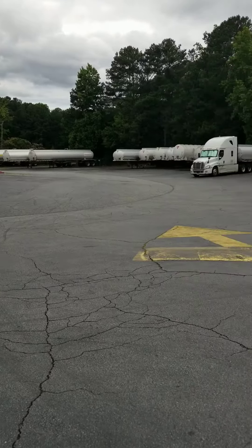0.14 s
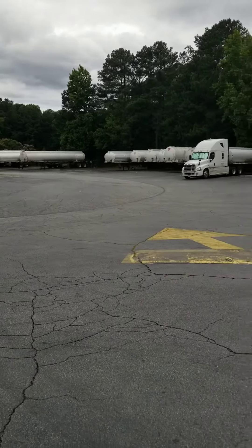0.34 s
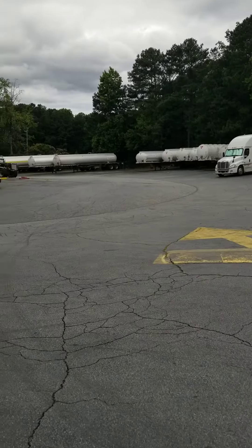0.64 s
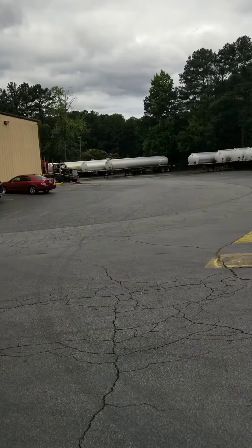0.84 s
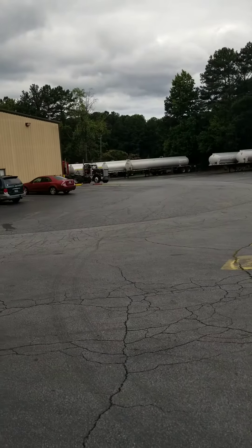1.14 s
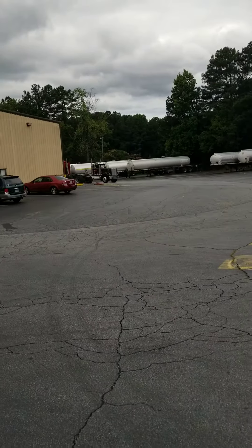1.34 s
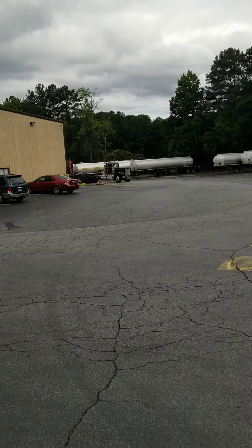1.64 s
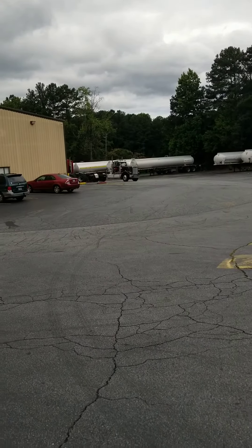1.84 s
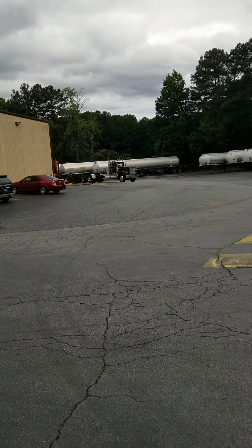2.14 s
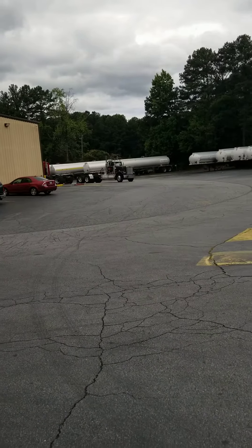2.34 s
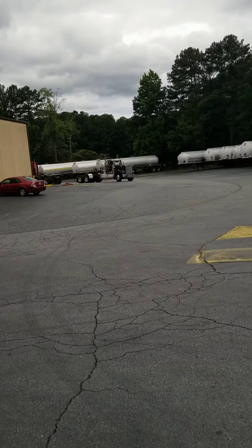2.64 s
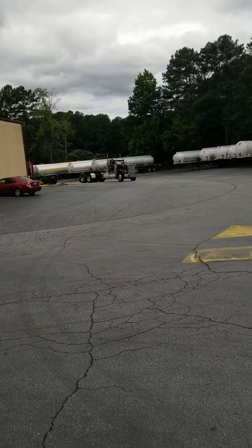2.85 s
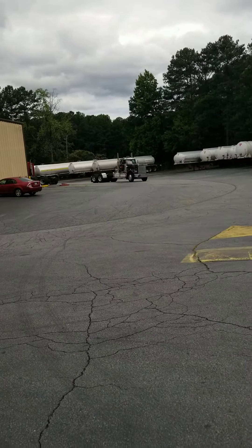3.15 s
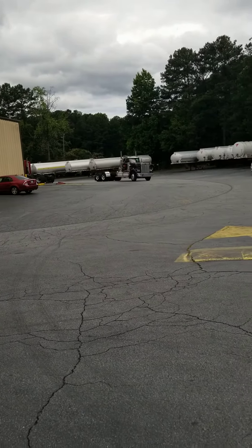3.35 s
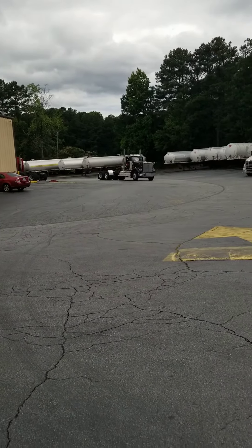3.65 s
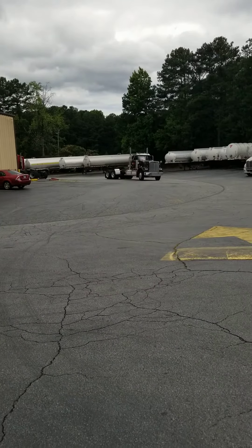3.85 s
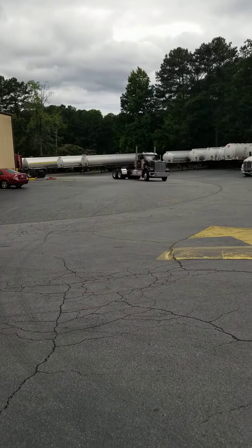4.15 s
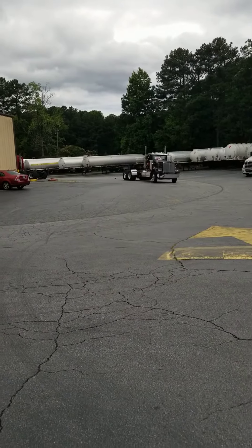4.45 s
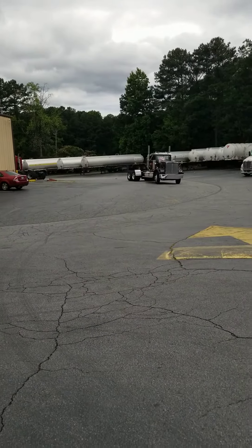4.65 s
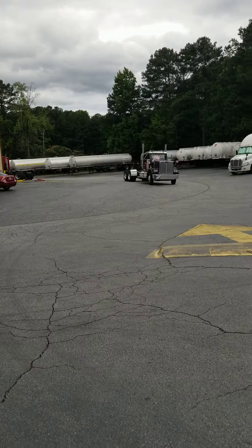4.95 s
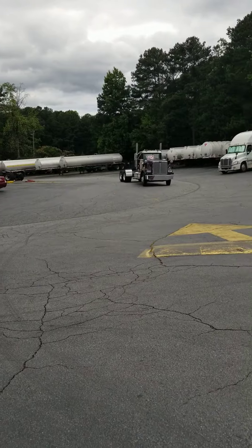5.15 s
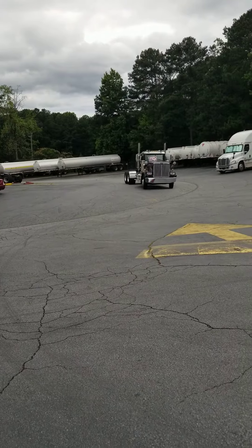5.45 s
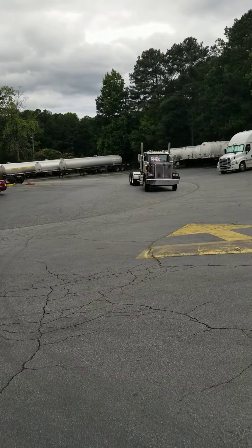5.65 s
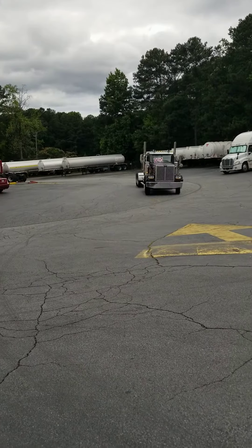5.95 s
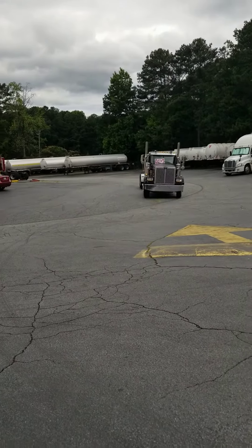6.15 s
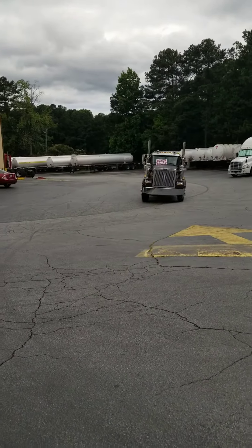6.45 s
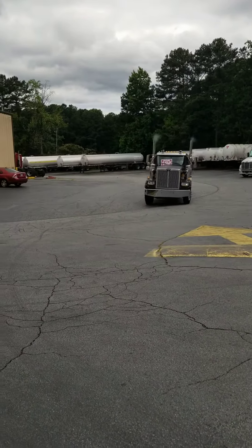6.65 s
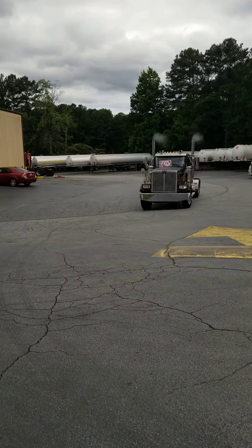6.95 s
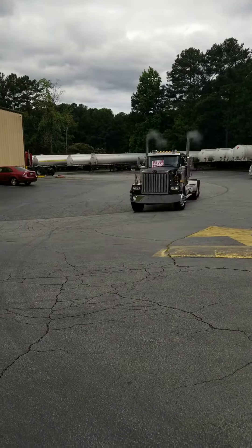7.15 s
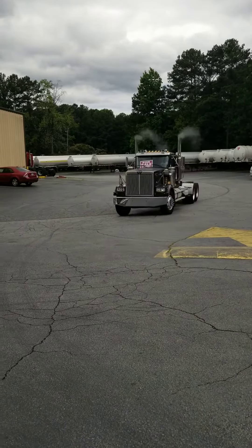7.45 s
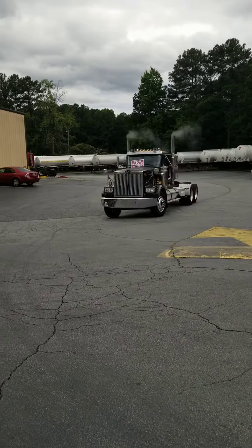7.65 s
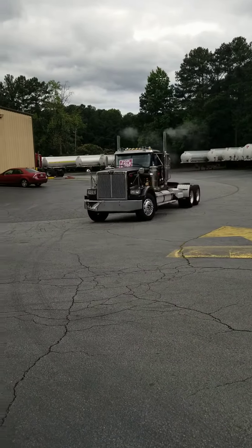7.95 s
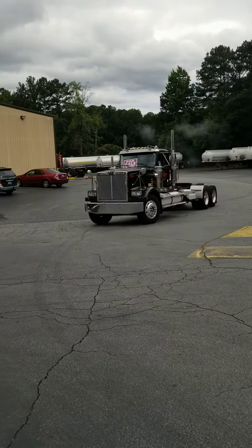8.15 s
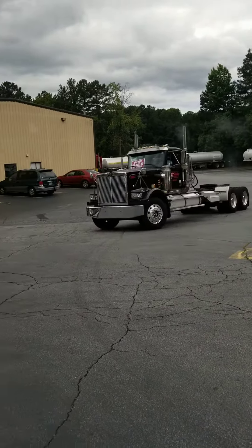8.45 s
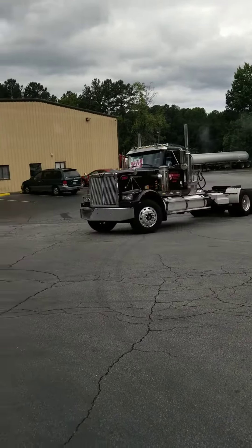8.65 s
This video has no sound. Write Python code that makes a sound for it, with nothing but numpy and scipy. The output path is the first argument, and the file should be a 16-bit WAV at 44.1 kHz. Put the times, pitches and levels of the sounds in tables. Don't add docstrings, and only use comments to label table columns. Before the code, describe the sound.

From 0 to 1 s a distant diesel truck is faint and dull behind a shed, over a soft low breeze. From 1 to 2.5 s it emerges, its twin stacks droning with a lumpy, uneven beat. Between 2.5 and 5.8 s the firing note climbs steadily from about 80 to 94 Hz, swelling, with mechanical clatter, narrow airy intake rush, tyre rumble, hiss and a thin gear whine. Near 5.9 s the exhaust drops away under a low gust. From 6.0 to 7.3 s the engine brake barks very loudly: rapid, irregular, crackling pops with hollow pipe thumps, slowing in pitch and echoing around the yard for about half a second. It stops abruptly; quieter coasting follows, low at about 62 Hz, with small metallic knocks around 8.0 s. From 8.4 s to the end near 8.8 s the engine pulls again, louder and nearer. Stereo phone pickup, treble weaker on the left.

```python
import sys
import numpy as np
from scipy import signal
from scipy.fft import rfft, irfft
from scipy.io import wavfile
from scipy.ndimage import uniform_filter1d

SR = 44100
rng = np.random.default_rng(int(sys.argv[2]) if len(sys.argv) > 2 else 0)


def volts_from_decibels(level):
    exponent = np.asarray(level, float) / 20
    return 10 ** exponent


def inscribe(sig):
    pcm = np.round(np.clip(np.atleast_2d(sig).T, -1, 1) * 32767)
    wavfile.write(sys.argv[1], SR, pcm.astype(np.int16))


N = 388521
T = np.arange(N) / SR
HZ = np.maximum(np.arange(N // 2 + 1) * SR / N, 1)

BRAKE_ON_S, BRAKE_FULL_S, BRAKE_OFF_S = 5.995, 6.095, 7.325
SHED_DB, EMERGE_S = -15, 1.66
START_M, APPROACH_M_S = 56.33, 3.686
HEIGHTS_M2 = 6.324


def curves(table):
    s, *columns = np.transpose(table)
    return [np.interp(T, s, c) for c in columns]


def along(table):
    hz, value = np.transpose(table)
    return np.interp(np.log(HZ), np.log(np.maximum(hz, 1)), value)


def unit(x):
    return x / np.sqrt(np.mean(x ** 2))


def colour(x, table):
    return irfft(rfft(x) * volts_from_decibels(along(table)), N)


def struck(x, table):
    fold = irfft(np.log(volts_from_decibels(along(table))), N)
    fold[1:N // 2] *= 2
    fold[N // 2 + 1:] = 0
    return irfft(rfft(x) * np.exp(rfft(fold)), N)


def between(spectrum, low_hz, top_hz):
    return irfft(spectrum * ((HZ >= low_hz) & (HZ < top_hz)), N)


def resonance(x, hz, width_hz):
    return signal.lfilter(*signal.iirpeak(hz, hz / width_hz, fs=SR), x)


def walk(rate_hz):
    hold = int(SR / rate_hz)
    steps = np.repeat(rng.standard_normal(N // 300), hold)[:N]
    return 1.57 * uniform_filter1d(uniform_filter1d(steps, hold), hold)


def clicks(times_s, gains):
    out = np.zeros(N)
    np.add.at(out, (np.asarray(times_s) * SR).astype(int), gains)
    return out


def puffs(x, rise_s, fall_s):
    t = T[:2048]
    return signal.fftconvolve(x, (1 - np.exp(-t / rise_s)) * np.exp(-t / fall_s))[:N]


# hz, alike (0-1)
PORT_LIKENESS = [(60, 0.87), (300, 1), (600, 0.57), (1200, 0.63), (2500, 0.93), (5000, 0), (9000, 0),
                 (15000, 0.7)]


def wide_noise():
    mid, side = rfft(rng.standard_normal((2, N)))
    alike = np.clip(along(PORT_LIKENESS), 0, 1)
    mid, side = mid * np.sqrt(1 + alike), side * np.sqrt(1 - alike)
    return irfft(np.array([mid + side, mid - side]), N) / np.sqrt(2)


def off_ground(x, gain):
    distance_m = START_M - APPROACH_M_S * T
    place = np.arange(N) - 2 * HEIGHTS_M2 / distance_m * SR / 343
    return x + gain * np.array([np.interp(place, np.arange(N), c) for c in x])


# hz, level_db (per Hz)
BREEZE_COLOUR = [(12, -22), (25, 7), (40, 11), (60, 13), (100, -8.5), (200, -29.5), (3000, -79.5)]
BREEZE_DB, BREEZE_DB_PER_S = -52.5, 0.26
GUST_S, GUST_WIDTH_S, GUST_DB = 5.9, 0.35, 17.5


def breeze():
    gust_db = GUST_DB * np.exp(-((T - GUST_S) / GUST_WIDTH_S) ** 2)
    level_db = BREEZE_DB + BREEZE_DB_PER_S * T + 2 * walk(2.5) + gust_db
    return unit(colour(wide_noise(), BREEZE_COLOUR)) * volts_from_decibels(level_db)


YARD_T60_S, YARD_DB = .5, -13


def yard(x):
    t = T[:SR]
    own = rng.standard_normal((3, SR))
    own = own[0] + signal.lfilter([.7, -.55], [1, -.8], own[1:])
    fading = np.exp(-np.log(1000) * t / YARD_T60_S) * (t > .008)
    tail = signal.lfilter([1], [1, -.55], own * fading)
    tail = tail / np.sqrt(np.sum(tail[0] ** 2))
    return volts_from_decibels(YARD_DB) * signal.fftconvolve(x, tail, axes=1)[:, :N]


# start_s, pitch_hz, level_db
LOOSE_METAL = [
    (7.98, 1880, -35),
    (8.075, 1880, -30.5),
    (8.076, 2070, -36),
]


def knocks():
    out = 0
    for start_s, pitch_hz, level_db in LOOSE_METAL:
        ring = (T > start_s) * np.exp(-np.abs(T - start_s) / 0.0086)
        out = out + volts_from_decibels(level_db) * ring * np.sin(2 * np.pi * pitch_hz * T)
    return out


# hz, level_db (per Hz)
ROAD_COLOUR = [(45, -28.5), (70, -10.5), (110, -2), (160, -0.5), (220, -1), (300, -4), (400, -6.5),
               (480, -14.5), (560, -24), (4000, -93)]


def road(clatter_db, hidden_db):
    level_db = clatter_db + 1.5 - .25 * hidden_db + 1.4 * walk(6)
    return unit(colour(wide_noise(), ROAD_COLOUR)) * volts_from_decibels(level_db)


# start_s, pitch_hz
INTAKE_PITCH = [(0, 2256), (1.5, 2335), (2.4, 2804), (3.8, 2417), (4.4, 2621), (5.9, 1959), (8.1, 1930),
                (8.6, 2660)]


def intake():
    turn = np.exp(2j * np.pi * np.cumsum(curves(INTAKE_PITCH)[0]) / SR)
    low_pass = signal.butter(4, 300, fs=SR, output="sos")
    slow = signal.sosfilt(low_pass, rng.standard_normal((2, N)))
    return unit(slow[0] * turn.real + slow[1] * turn.imag)


# hz, level_db (per Hz)
CLATTER_COLOUR = [(260, -33), (450, -0.7), (556, -12.5), (686, -1.5), (763, -1), (1530, -13), (2470, -11.5),
                  (2830, -10.5), (3710, -15.5), (4250, -28.5), (6580, -29), (8890, -48.5), (11800, -40.5),
                  (13600, -53.5), (15300, -49.5)]
# start_s, level_db (of the clatter)
EFFORT = [(0, -48.5), (.66, -46.5), (1.05, -40), (1.64, -38), (2.3, -35.5), (3.8, -32.5), (5.2, -31),
          (5.9, -31), (7.38, -36.5), (7.69, -42.5), (8.33, -40.5), (8.53, -32.5), (8.72, -26.5)]
HISS_DB, AIR_DB = -17.5, -21.5
TOP_DB, TOP_EMERGE_S = -14, 2.5


def running(cycle):
    clatter_db, hidden_db = curves(EFFORT)[0], SHED_DB * np.exp(-T / EMERGE_S)
    throb = 1 + 0.11 * np.cos(2 * np.pi * 6 * cycle) + 0.04 * np.cos(2 * np.pi * cycle)
    noise = rfft(off_ground(colour(wide_noise(), CLATTER_COLOUR), 0.059))
    clatter = 0
    edges_hz = [300, 700, 1300, 1900, 2500, 3200, 4200]
    for low_hz, top_hz in zip(edges_hz[:-1], edges_hz[1:]):
        flutter_db = 0.68 * walk(7) + 1.12 * walk(3.106)
        clatter = clatter + volts_from_decibels(flutter_db) * between(noise, low_hz, top_hz)
    hiss = unit(between(noise, 4200, 8500)) * volts_from_decibels(HISS_DB + 0.37 * walk(12))
    top = between(noise, 12800, 15850) * volts_from_decibels(TOP_DB * np.exp(-T / TOP_EMERGE_S))
    air = unit(between(noise, 8500, 12800) + top) * volts_from_decibels(AIR_DB + hidden_db)
    rush_db = 1.2 * walk(9) - 7 - 5 * (T > BRAKE_OFF_S) + .5 * np.minimum(clatter_db + 37, 0)
    engine = unit(clatter) + volts_from_decibels(rush_db) * intake() + hiss + air
    return volts_from_decibels(clatter_db) * throb * engine + road(clatter_db, hidden_db)


# start_s, pitch_hz (firing rate)
FIRING_RATE = [(0, 75.21), (.8, 75.5), (1.45, 76.43), (2.2, 81.77), (2.75, 84.43), (3.85, 89.38),
               (4.95, 94.27), (5.5, 93.7), (5.85, 89.2), (6.08, 87.8), (7.33, 60.66), (7.45, 64.94),
               (7.75, 64.85), (8.1, 61.84), (8.4, 62.5), (8.62, 64.3), (8.81, 66.6)]
# start_s, firing_db, octave_db, uneven_db, upper_db (uneven tones)
STACK_LEVELS = [(0, -43, -38.5, -45, -49), (.55, -38, -42.5, -40.5, -47.5), (.95, -43.5, -32, -28.5, -42),
                (1.45, -37, -42, -20.5, -37.5), (1.8, -34, -21.5, -20.5, -28.5),
                (2.35, -40, -20.5, -26, -32.5), (2.7, -32, -21, -25, -28), (3.2, -27, -26.5, -21.5, -28.5),
                (3.75, -34, -22, -19, -27), (4.3, -26.5, -11, -19, -31.5), (5.1, -21.5, -19, -23, -44),
                (5.35, -19, -25.5, -26, -41), (5.62, -21, -27.5, -23, -54), (5.85, -45, -41.5, -41.5, -52),
                (6.05, -28.5, -13, -36, -27), (7.45, -39, -43.5, -38, -30.5),
                (8.35, -34, -39.5, -36.5, -46), (8.65, -24.5, -23.5, -28.5, -32)]
# order (multiple of the cycle rate), level_db
UNEVEN_TONES = [(3, -30), (4, -18), (5, -38.5), (7, -25), (8, -16), (9, -2), (10, -18.5), (11, -28),
                (13, -7), (14, -13), (15, -13.5), (16, -2.5), (17, -25), (18, -2.5), (19, 0), (20, -16),
                (21, -19), (22, -5.5), (23, -7), (24, -11.5), (25, -13), (26, -8.5), (27, -36.5),
                (28, -10.5), (29, -23.5), (30, -15), (31, -40), (32, -14)]
# hz, gain_db
SILENCER = [(60, -12), (95, -7), (112, -34), (138, -5), (200, -5), (260, -3), (310, -10), (390, 7.5),
            (420, -19.5), (500, -24)]
# start_s, level_db
GEAR_SONG = [(2.3, -62), (3.2, -49), (3.9, -41), (5.0, -43), (5.6, -50), (6.0, -66)]
TIMING_TEETH, PUMP_TEETH = 45, 165.8
PUMP_DB = -17.5
FADING_DB, BLUR_RAD = 2, 1.2


def stacks(cycle, braking):
    rate_hz, work_db = curves(FIRING_RATE)[0], curves(EFFORT)[0]
    firing_db, octave_db, uneven_db, upper_db = curves(STACK_LEVELS)
    hidden = np.exp(-T / EMERGE_S)
    turn = 2 * np.pi * cycle
    firing_db = firing_db + walk(11) + FADING_DB * (1 + hidden) * walk(5)
    steady = volts_from_decibels(firing_db) * np.sin(6 * turn + BLUR_RAD * hidden * walk(14))
    octave_db = octave_db + FADING_DB * (.5 + hidden) * walk(5)
    fired = volts_from_decibels(octave_db) * np.sin(12 * turn + BLUR_RAD / 2 * hidden * walk(14))
    for order, tone_db in UNEVEN_TONES:
        order = round(order)
        silencer_db = np.interp(order * rate_hz / 6, *np.transpose(SILENCER))
        level_db = tone_db + (upper_db if order > 18.5 else uneven_db) + silencer_db
        phase = rng.uniform(0, 2 * np.pi) + .6 * walk(6)
        fired += volts_from_decibels(level_db + 2.0 * walk(4)) * np.sin(order * turn + phase)
    gears = [(TIMING_TEETH, curves(GEAR_SONG)[0]), (PUMP_TEETH, work_db + PUMP_DB)]
    for teeth, level_db in gears:
        steady += volts_from_decibels(level_db + 1.5 * walk(8)) * np.sin(teeth * turn + .5 * walk(40))
    return np.sqrt(2) * (steady + fired * (1 - braking))


# late (share of a firing gap), thump_db, bark_db, crack_db, crack_fade (dB per s)
CYLINDER_VENTS = [(0, -3, 0, -26, -2), (0, -14, -6, -42, -5), (-.06, 0, 1.5, -26, -15),
                  (0, -3, -5, -33, -15), (-.05, -14, .5, -30, -10), (-.12, .5, 1, -24, -7)]
VENT_S, CYCLE_HZ, SAG_HZ_PER_S = 6.081, 14.67, 3.624
CRACK_SCATTER_DB, THUMP_SCATTER_DB = 1.2, 1.2
SHARPER_S, SHARPER_DB = 6.88, 7


def vents():
    firing = np.arange(6 * 16)
    late, thump_db, bark_db, crack_db, fade = np.array(CYLINDER_VENTS)[firing % 6].T

    def reached_s(count):
        return (CYCLE_HZ - np.sqrt(CYCLE_HZ ** 2 - 2 * SAG_HZ_PER_S * count / 6)) / SAG_HZ_PER_S

    since = reached_s(firing + late)
    even = VENT_S + reached_s(firing)
    times = VENT_S + since
    chance = rng.standard_normal((4, len(firing)))
    thump_db = thump_db + THUMP_SCATTER_DB * chance[0]
    bark_db = bark_db * (.3 + since) + 1.5 * chance[1]
    sharper_db = SHARPER_DB * (firing % 6 == 0) * (times > SHARPER_S)
    crack_db = crack_db + fade * since + CRACK_SCATTER_DB * chance[3] + sharper_db
    on = (times > BRAKE_FULL_S) & (times < BRAKE_OFF_S)
    return np.array([times, thump_db, bark_db, crack_db, chance[2], even])[:, on]


# start_s, level_db (over the brake level), crack_db
FIRST_BARKS = [
    (6.0003, 5, -24),
    (6.0327, 4, -21),
    (6.0655, 3, -18.5),
    (6.0815, 1, -23),
]
# hz, level_db (per Hz)
CRACK_COLOUR = [(1000, -38), (2800, 29.5), (4500, 13), (6500, 11.5), (8500, 6.5), (11000, 16), (13300, 2.5),
                (15300, 3.5)]


def cracks(times, crack_db):
    first_s, _, first_db = np.transpose(FIRST_BARKS)
    blows = clicks(np.append(times, first_s), volts_from_decibels(np.append(crack_db, first_db) + 4.5))
    return unit(colour(wide_noise(), CRACK_COLOUR)) * puffs(blows, .00006, .0018)


# pitch_hz, width_hz, level_db
PIPE_RINGS = [(155, 14, -5), (212, 20, 0), (258, 18, 0), (342, 16, -15)]
# hz, level_db (per Hz)
BARK_COLOUR = [(240, -50), (420, -12.5), (560, 0), (700, 3), (900, 2), (1400, -6), (2000, -3), (2900, -5),
               (3500, -12), (4200, -18), (6500, -29), (8500, -41), (11500, -42), (16000, -58)]
THUMP_DB, THUMP_START_DB, THUMP_RISE_S = -15.5, 0.5, 0.12
BARK_DB, BARK_DB_PER_S = -22.5, -3.5
BLOW_DB, BLOW_DB_PER_S = -21.5, -18


def brake(times, thump_db, bark_db, crack_db, chance, even):
    first_s, first_db, _ = np.transpose(FIRST_BARKS)
    first = clicks(first_s, volts_from_decibels(first_db))
    thumps = clicks((even + times) / 2, volts_from_decibels(thump_db)) + first
    pipe = 0
    for k, (pitch_hz, width_hz, level_db) in enumerate(PIPE_RINGS):
        pipe = pipe + (-1) ** k * volts_from_decibels(level_db) * resonance(thumps, pitch_hz, width_hz)
    pipe = signal.sosfilt(signal.butter(3, [135, 370], "band", fs=SR, output="sos"), pipe)
    size = volts_from_decibels(bark_db) + volts_from_decibels(.7 * (crack_db + 17))
    barks = clicks(times, size) + 0.92 * first
    fronts = barks + .45 * clicks(times + .0021 + .0003 * chance, size)
    spit = puffs(barks, .0001, .0011) * wide_noise()
    bark = struck(5 * fronts + spit, BARK_COLOUR)
    blow = unit(colour(wide_noise(), BARK_COLOUR)) * unit(puffs(barks, .001, .007))
    since = np.clip(T - BRAKE_ON_S, 0, 2)
    share = np.sqrt((BRAKE_OFF_S - BRAKE_ON_S) * SR / N)
    thump = unit(pipe) * volts_from_decibels(THUMP_DB + THUMP_START_DB * np.exp(-since / THUMP_RISE_S))
    bark = unit(bark) * volts_from_decibels(BARK_DB + BARK_DB_PER_S * since)
    blow = blow * volts_from_decibels(BLOW_DB + BLOW_DB_PER_S * since)
    return share * thump, share * (bark + blow)


def scene():
    cycle = np.cumsum(curves(FIRING_RATE)[0]) / SR / 6
    braking = uniform_filter1d(1. * ((T > BRAKE_ON_S) & (T < BRAKE_OFF_S)), size=1500)
    vented = vents()
    thump, bark = brake(*vented)
    barks = thump + off_ground(bark + cracks(vented[0], vented[3]), .42)
    echoes = yard(barks - thump / 2)
    return breeze() + echoes + knocks() + running(cycle) + stacks(cycle, braking) + barks


def top_cut(x):
    return signal.sosfilt(signal.butter(12, 17040, fs=SR, output="sos"), x)


# hz, level_db
PORT_SHADE = [(60, -0.5), (110, -0.5), (200, -2.0), (380, -5.5), (700, -2), (1290, -4.5), (2380, -15.5),
              (4400, -6), (8120, -14), (15000, -37)]
# hz, phase_rad
PORT_LEAD = [(0, 0), (690, -.9), (1120, -.2), (1550, -1.1), (2300, -.6), (2800, .5), (4300, 3.2), (8000, 6),
             (16600, 14)]


def record(dry):
    left = volts_from_decibels(along(PORT_SHADE))
    ahead = np.exp(1j * np.interp(HZ, *np.transpose(PORT_LEAD)))
    ports = np.array([left * ahead, np.ones_like(left)]) * 2 / (1 + left)
    x = irfft(rfft(dry) * ports, N)
    x = x / (1 + np.abs(x) ** 5) ** (1 / 5)
    mix = irfft(rfft(x) * (HZ < 15850), N)
    return top_cut(mix)


dry = scene()
out = record(dry)
inscribe(out)
```